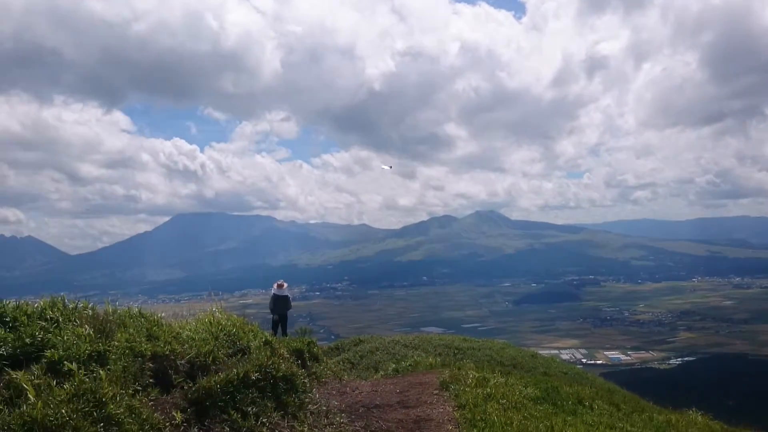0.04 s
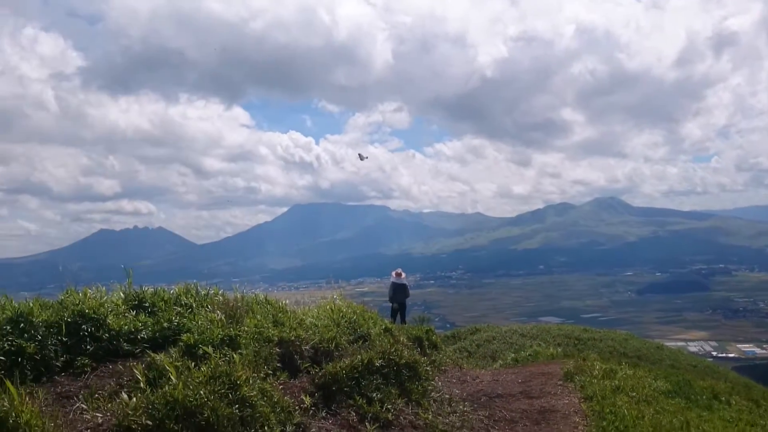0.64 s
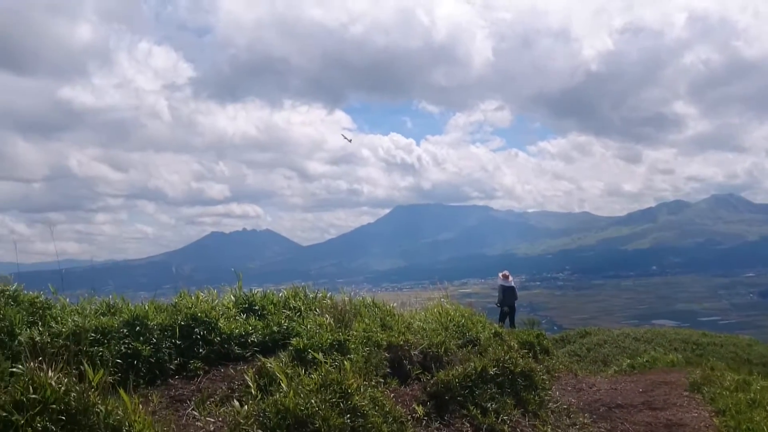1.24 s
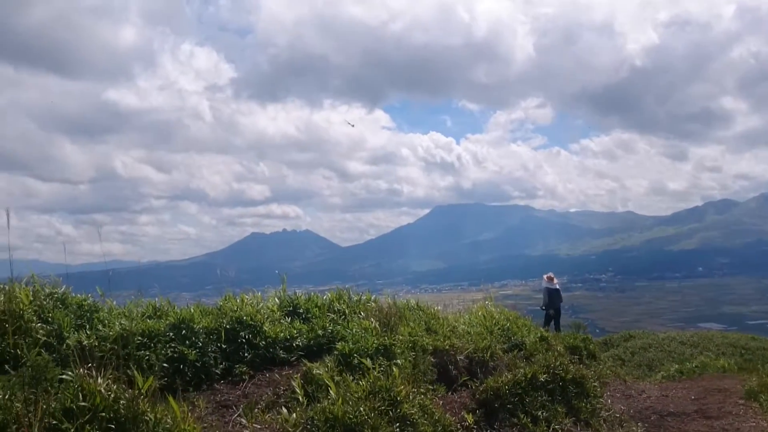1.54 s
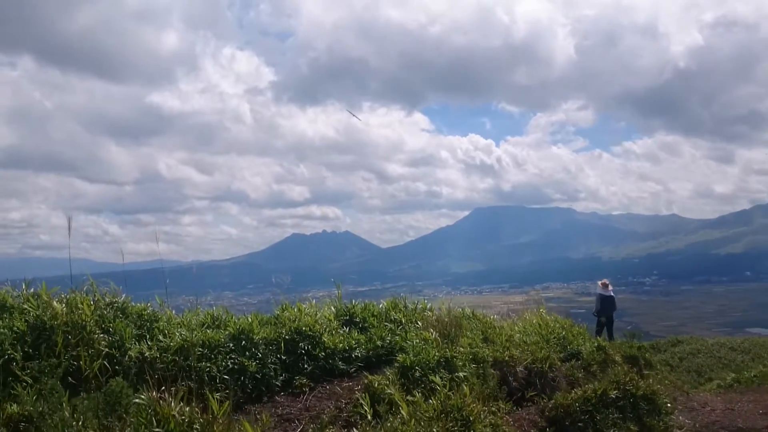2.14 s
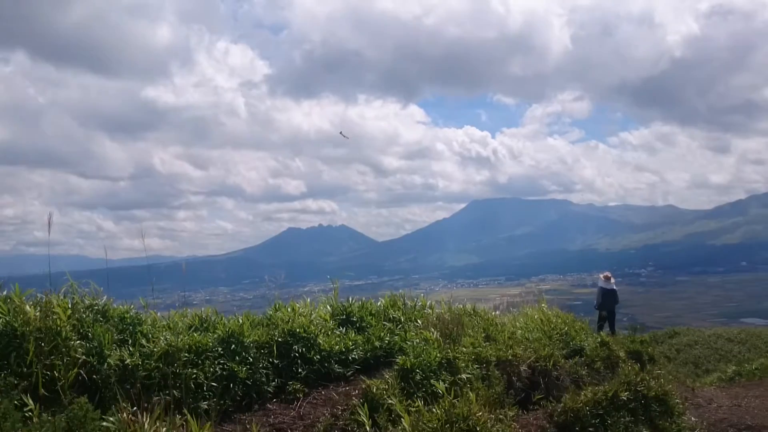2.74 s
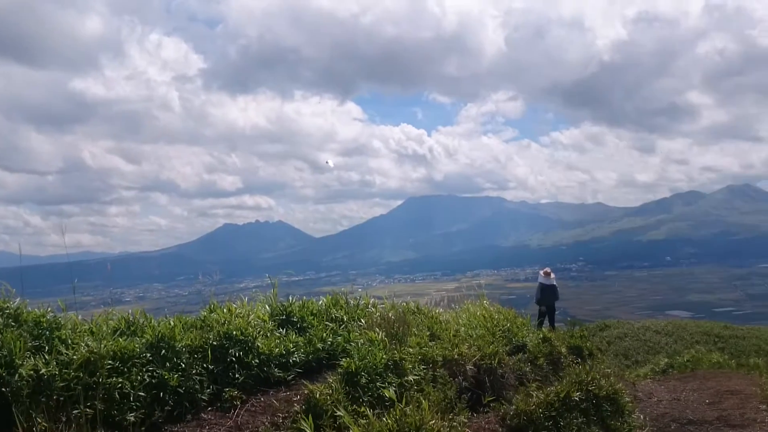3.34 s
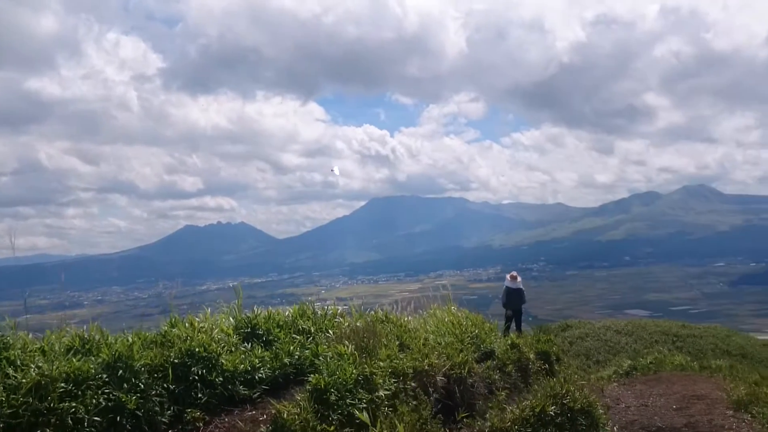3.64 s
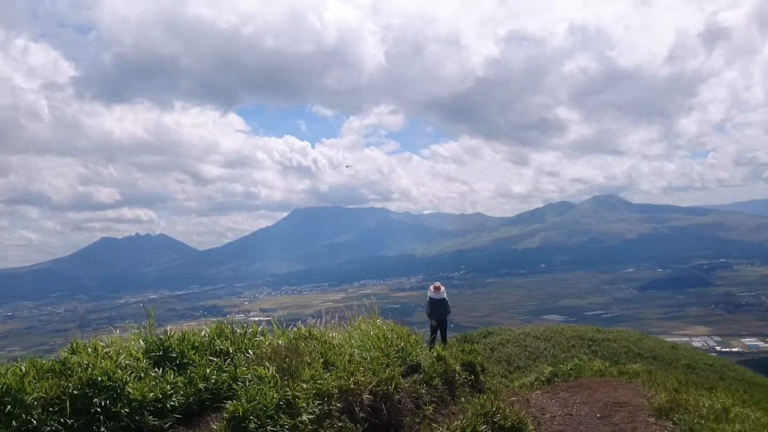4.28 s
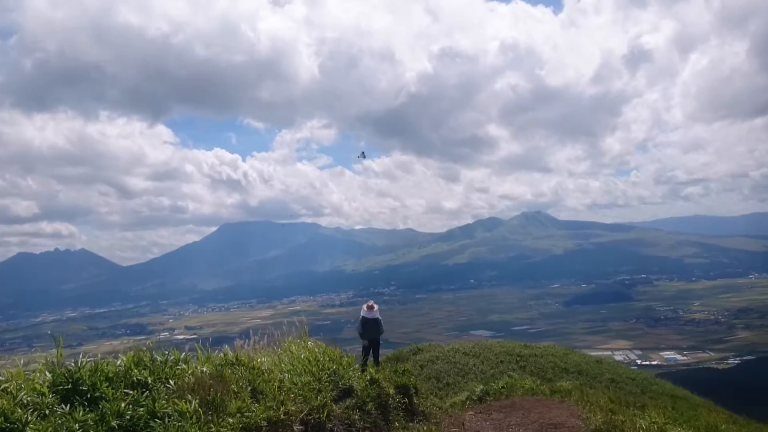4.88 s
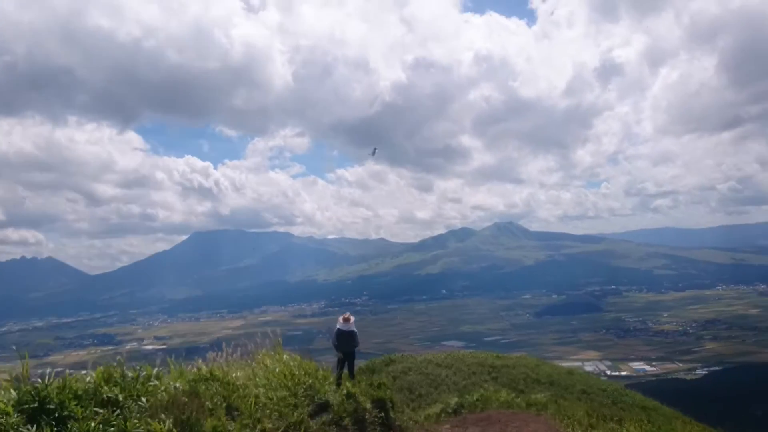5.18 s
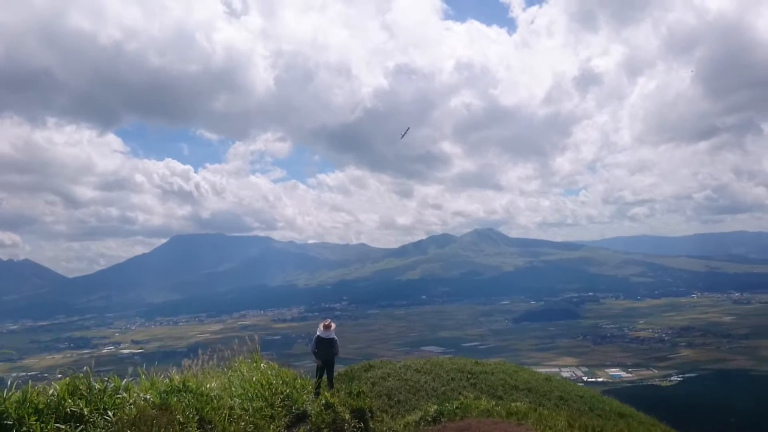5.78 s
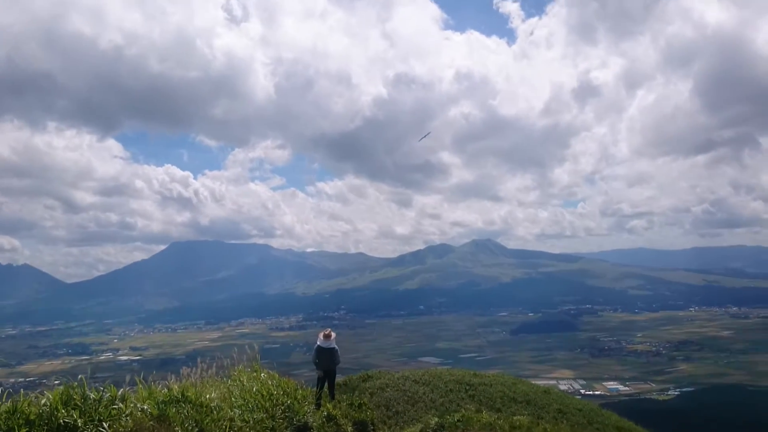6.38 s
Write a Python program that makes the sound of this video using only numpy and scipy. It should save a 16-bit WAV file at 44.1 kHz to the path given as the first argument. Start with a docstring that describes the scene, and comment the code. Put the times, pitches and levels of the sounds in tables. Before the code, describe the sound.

Dry rustles swell close by on a breezy hilltop while insects trill and gusts thump the microphone.

```python
"""A grassy hilltop in light wind, on the two microphone ports of a small hand-held camera.
From the start a cricket trills in the grass to the left and a katydid rasps to the right, over quiet air.
In the first second or so eddies thump the ports. Close by, dry rustles (grass blades or a jacket sleeve)
swell again and again, with a few sharp ticks. Near five seconds both insects sing louder, and after six
the strongest gusts buffet the right port."""
import sys
import numpy as np
from scipy import signal
from scipy.fft import rfft, irfft
from scipy.io import wavfile
from scipy.ndimage import uniform_filter1d

SR = 44100
rng = np.random.default_rng(int(sys.argv[2]) if len(sys.argv) > 2 else 0)


def store_pcm(level_fs):
    """Save levels as 16-bit WAV."""
    pcm = np.round(np.clip(level_fs, -1, 1) * 32767).astype(np.int16)
    wavfile.write(sys.argv[1], SR, np.atleast_2d(pcm).T)


N = 291942
TIME = np.arange(N) / SR
FREQ = np.arange(N // 2 + 1) * SR / N
PORT_LAG_S = 0.000344  # the right port hears this much later


def rustle():
    """Close by, dry surfaces catch and slip; harder rubbing makes the slips denser and brighter."""
    # tone of the rustle at each port: frequency_hz, left_db, right_db
    tone = [(300.0, -32.5, -22.5), (740, -17.5, -12), (1230, -17.5, -6.5), (2020, -19, 2),
            (2940, -17.5, -3.5), (3810, -18.5, 1.5), (4260, -20.9, -3.5), (4990, -20.5, -18),
            (6730, -7.5, -9), (7300, -8, -15), (9330, -9.5, -16.5), (10800, -20, -19.5),
            (11500, -28.5, -14.5), (15200, -31, -15)]
    # how much of it both ports share: frequency_hz, power_share
    likeness = [(300, 0.86), (1000, 0.99), (2300, 0.2), (4000, 0.63), (6800, 0), (10000, 0), (15000, 0.6)]
    # dull scuffs where the rubbing bites: peak_s, level_db, half_length_s
    scuffs = [(.27, -58, 0.028), (1.67, -55, 0.0091), (4.936, -67, 0.02), (5.209, -55, 0.022),
              (5.681, -54.5, 0.043), (6.451, -47, 0.013)]
    rub_db, bright_db = rubbing()
    effort_db = rub_db + 51
    grains = slips(per_s=2400 * undb(0.62 * effort_db), spread_db=2.5, hiss=0.99)
    grains *= undb(0.98 * walk(64))
    heard = ports(grains[0], grains[1:], likeness)
    friction = colour(heard, tone)
    high, top = treble(friction, hz=4680), treble(friction, hz=11100)
    body = (friction - high) / np.std((friction - high).mean(axis=0))
    top_gain = undb(0.084 * effort_db + 1.4)
    sheen = (high + top * (top_gain - 1)) / np.std(high.mean(axis=0))
    swish = body * undb(-2 + 0.82 * walk(25)) + sheen * undb(bright_db + 0.48 * walk(23))
    scuff = unit(band(heard, hz=1200, width_hz=1400))
    bite = sum(undb(db) * swell(s, half_s, 0, half_s) for s, db, half_s in scuffs)
    return swish * undb(rub_db) + scuff * pan(-8) * bite


def rubbing(contact_treble_db=-5):
    """Level and treble of the rubbing in dB: overlapping strokes add in power to the light contact."""
    # light contact that goes on between strokes: time_s, level_db
    contact = [(0, -69.5), (.3, -58.5), (1.15, -62.5), (1.8, -58.5), (4.45, -59), (4.75, -63), (5.45, -67),
               (5.85, -63), (6.25, -69.5), (6.62, -63.5)]
    # rubbing strokes near the microphone: peak_s, level_db, rise_s, hold_s, fade_s, treble_db
    strokes = [(0.31, -53.5, 0.057, 0.27, 0.093, 1), (0.711, -47.5, 0.096, 0.096, 0.078, -0.5),
               (1.027, -57, 0.028, 0.061, 0.018, 0), (1.299, -56, 0.064, 0.087, .1, -2),
               (1.643, -41.5, .12, 0.014, 0.086, -1.5), (1.934, -57, 0.065, 0.16, .06, -4),
               (2.136, -53.5, .05, .05, 0.078, 1), (2.29, -47.5, 0.067, 0.032, .11, 1.5),
               (2.507, -47, 0.16, 0.059, 0.031, -0.5), (2.76, -53.5, 0.037, 0.047, 0.061, -3),
               (2.893, -52, .03, 0.15, 0.024, -3), (3.258, -43.5, 0.12, 0.049, 0.084, -1),
               (3.465, -59, 0.16, 0.067, 0.19, 0), (3.702, -53.5, 0.028, 0.07, 0.031, -3.5),
               (3.977, -50, 0.17, .18, 0.075, 0.5), (4.264, -55.5, 0.042, 0.025, 0.012, 1.5),
               (4.523, -55, .02, 0.11, 0.046, -6.5), (4.921, -42.5, 0.072, 0.019, .03, -2.5),
               (4.986, -53.5, 0.032, 0.078, .15, -2.5), (5.32, -59, 0.048, 0.036, 0.027, -5),
               (5.535, -60, 0.052, 0.074, .05, 3), (5.663, -50, 0.049, 0.017, 0.027, -1),
               (6.071, -56.5, 0.16, 0.023, 0.03, -6), (6.487, -58, 0.04, 0.017, 0.019, -6),
               (6.604, -60, 0.019, .02, .04, -13)]
    power = undb(curves(contact)[0]) ** 2
    weighted_treble = power * contact_treble_db
    for s, db, rise_s, hold_s, fade_s, treble_db in strokes:
        stroke_power = (undb(db) * swell(s, rise_s, hold_s, fade_s)) ** 2
        power += stroke_power
        weighted_treble += stroke_power * treble_db
    return 10 * np.log10(power), weighted_treble / power


def slips(per_s, spread_db, hiss):
    """Three streams of tiny slips, most weak and a few strong, over the hiss of countless smaller ones."""
    hit = rng.random((3, N)) < per_s / SR
    size = undb(spread_db * np.minimum(rng.exponential(size=(3, N)), 5))
    crackle = unit(hit * size * rng.choice([-1, 1], (3, N)))
    return unit(crackle + hiss * rng.standard_normal((3, N)))


def ticks(decay_s=0.0025, gain_db=1.5):
    """A stiff bit snaps free: a crack that dies within milliseconds and reaches the right port later."""
    # single cracks: start_s, relative_level_db, relative_treble_db
    cracks = [(1.0097, -39.5, -4), (1.4235, -45, -4), (1.915, -49, -6), (1.934, -40, -23),
              (2.1044, -43, -29), (2.305, -35, -7), (2.4698, -32.5, -14), (2.5794, -40, -5),
              (2.6408, -38, -9), (3.105, -38.5, -13), (3.8647, -39, -6), (4.5234, -44.5, -14),
              (4.81, -37.5, -13), (5.0392, -37, -22), (5.1014, -44, -2), (5.4541, -50, -15),
              (5.523, -43.5, -9), (6.095, -37, -17), (6.447, -40.5, -13)]
    # tone of a crack's treble: frequency_hz, gain_db
    snap_tone = [(3000, -30), (5200, -18), (6600, -4), (8500, -3), (10500, -7), (15000, -6)]
    knocks, snaps = np.zeros((2, N))
    age = np.arange(SR // 50) / SR
    knock_filter = signal.butter(3, [1200, 3900], "band", fs=SR, output="sos")
    for s, db, bright_db in cracks:
        crack = rng.standard_normal(len(age)) * np.exp(-age / decay_s)
        knock = signal.sosfilt(knock_filter, crack)
        at = slice(int(s * SR), int(s * SR) + len(age))
        knocks[at] += undb(db) * knock / np.abs(knock).max()
        snaps[at] += undb(db + bright_db) * crack / np.abs(crack).max()
    snaps = undb(13) * colour(snaps, snap_tone)
    left, right = undb(gain_db) * (pan(-23) * knocks + pan(2) * snaps)
    return np.array([left, np.roll(right, int(PORT_LAG_S * SR))])


def buffeting():
    """Turbulence presses on each port separately; the strongest eddies are single push-pull thumps."""
    # tone of wind on the microphone: frequency_hz, gain_db
    tone = [(15, -54), (30, -38), (52, 6), (72, 7.5), (110, -1), (170, -13.5), (250, -30), (400, -38),
            (900, -77)]
    # single eddies that hit a port: peak_s, level_db, left_minus_right_db, half_length_s
    eddies = [(0.631, -45, -17, 0.0012), (0.845, -34.5, -30, 0.0032), (0.882, -38.5, 20, 0.0011),
              (1.07, -43, 6, 0.0018), (6.175, -24.5, -23, 0.0019), (6.21, -27.5, -26, 0.0015)]
    rumble = unit(colour(rng.standard_normal((2, N)), tone))
    # the gust sets the strength, so the rumble's own swings are partly evened out
    rumble = unit(rumble / uniform_filter1d(rumble ** 2, SR // 20) ** 0.5)
    wind = rumble * flow()
    for s, db, side_db, half_s in eddies:
        offset = (TIME - s) / half_s
        wind += undb(db) * pan(side_db) * (1 - offset ** 2) * np.exp(-offset ** 2 / 2)
    return wind


def flow(breeze_db=-71, breeze_side_db=-3.5):
    """Strength of the wind at each port: gusts, each favouring one side, over a light breeze."""
    # gusts on the microphone: peak_s, level_db, rise_s, hold_s, fade_s, left_minus_right_db
    gusts = [(0.05, -57.5, 0.047, 0.017, 0.082, -11), (.42, -59, 0.044, 0.13, .03, -21),
             (0.616, -44, 0.013, 0.019, 0.026, -27), (.715, -45.5, .02, .02, 0.025, -21),
             (0.805, -42.5, 0.023, 0.026, 0.025, -23), (0.878, -39.5, .015, 0.013, 0.02, 15),
             (0.943, -50, .03, 0.17, 0.039, -16), (1.067, -40, 0.012, 0.017, 0.022, 4),
             (1.196, -55.5, 0.067, 0.22, .13, 6), (2.43, -61, 0.053, 0.1, 0.042, 9),
             (2.795, -67.5, 0.043, 0.19, 0.066, 6), (3.39, -67, .03, 0.17, .04, 5),
             (4.44, -67, 0.051, .17, .04, -23), (4.797, -59, .02, 0.0089, 0.017, -34),
             (4.937, -58, 0.022, 0.022, .03, -20), (5.518, -46, 0.053, 0.081, .04, -29),
             (5.674, -46.5, .03, 0.2, 0.033, -7), (6.047, -36, 0.063, 0.045, 0.033, -22),
             (6.17, -31, 0.032, 0.041, 0.024, -19), (6.262, -34.5, 0.029, 0.15, .025, -18),
             (6.438, -28, 0.024, .04, 0.046, -21), (6.62, -40, 0.044, 0.022, 0.035, -4)]
    power = (undb(breeze_db) * pan(breeze_side_db)) ** 2
    for s, db, rise_s, hold_s, fade_s, side_db in gusts:
        power = power + (undb(db) * pan(side_db) * swell(s, rise_s, hold_s, fade_s)) ** 2
    return np.sqrt(power)


def katydid(strokes_per_s=55, chirp_s=0.09):
    """In the grass to the right: evenly spaced chirps of rasping wing strokes, each louder than the last."""
    # bouts of chirping: start_s, end_s, chirp_period_s, relative_level_db
    bouts = [(0.038, .92, .187, -60.5), (1.045, 1.37, .185, -59), (1.774, 3.04, .187, -64),
             (3.556, 4.5, .194, -63.5), (4.534, 6.62, .194, -58)]
    # tone of the wings' rasp: frequency_hz, gain_db
    tone = [(9000, -41), (10900, -26), (11700, -1), (12400, -2), (13000, -3), (14000, -16), (16000, -33)]
    strokes = np.zeros(N)
    for start, end, period_s, db in bouts:
        age = (TIME - start) % period_s
        singing = (TIME >= start) & (TIME < end) & (age < chirp_s)
        crescendo = 0.5 + age / chirp_s
        strokes += undb(db) * singing * crescendo * np.sin(np.pi * age * strokes_per_s) ** 2
    rasp = unit(colour(rng.standard_normal((2, N)), tone))
    song = scatter(rasp * strokes, echo=0.7, decay_s=0.012)
    return song * pan(-16) * undb(-3 + 0.8 * walk(20))


def cricket(roughness=0.5):
    """To the left: each wing stroke starts as a high note, then fades and falls as the scraper slows."""
    # course of the trill: time_s, strokes_per_s, level_db, pitch_hz
    trill = [(0, 34.7, -71, 8800), (1.2, 35.8, -67, 8820), (3, 35.5, -68, 8850), (4.4, 35.5, -68, 8900),
             (4.7, 35.5, -64, 8900), (5.2, 35.5, -61.5, 8900), (5.8, 35.4, -63.5, 8820),
             (6.62, 35.1, -62.5, 8780)]
    strokes_per_s, db, hz = curves(trill)
    stroke_phase = np.cumsum(strokes_per_s * (1 + 0.01 * walk(13.6))) / SR % 1
    follow_through = 0.45 * undb(0.5 * (db + 63))  # harder singing draws the stroke out
    push = np.exp(-((stroke_phase - 0.3) / 0.14) ** 2)
    push += follow_through * np.exp(-((stroke_phase - 0.56) / 0.16) ** 2)
    pitch_hz = hz - 2400 * np.maximum(stroke_phase - 0.37, 0) + 95 * walk(300)
    note = push * np.sin(2 * np.pi * np.cumsum(pitch_hz) / SR) * (1 + roughness * walk(380))
    song = scatter(note, echo=0.6, decay_s=0.014)
    return unit(song) * undb(db) * pan(12)


def scatter(call, echo, decay_s):
    """Stems and ground add a short diffuse tail to an insect's call, different at each port."""
    age = np.arange(SR // 12) / SR
    tail = rng.standard_normal((2, len(age))) * np.exp(-age / decay_s)
    tail = echo * tail / np.sqrt(np.sum(tail ** 2, axis=1, keepdims=True))
    return call + signal.fftconvolve(np.atleast_2d(call), tail, axes=1)[:, :N]


def air(level_db=-61):
    """Wind over the far slopes: a soft, nearly steady hiss."""
    # tone of the distant wind: frequency_hz, left_db, right_db
    tone = [(30, -22, -22), (80, -1, -1), (160, -7, -7), (280, -6, -4), (500, -6, -4), (900, -8, -8),
            (1500, -12, -10), (2200, -14, -11), (3600, -19, -16), (5000, -22, -20), (6800, -16, -19),
            (10300, -27, -27), (14500, -23, -22)]
    # how much of it both ports share: frequency_hz, power_share
    likeness = [(100, 0.93), (400, 0.56), (1000, 0.06), (3000, 0), (8000, 0)]
    noise = rng.standard_normal((3, N))
    bed = unit(colour(ports(noise[0], noise[1:], likeness), tone))
    return bed * undb(level_db + 0.088 * walk(14))


def ports(common, own, likeness, bass_turn_rad=2.73):
    """A wide stereo pair: the right port hears shared sound later, its lows nearly in opposite phase."""
    share = np.clip(spectra(likeness)[0], 0, 1)
    turn = np.maximum(bass_turn_rad, 2 * np.pi * FREQ * PORT_LAG_S)
    shared = rfft(common) * np.array([np.ones(len(FREQ)), np.exp(-1j * turn)])
    return irfft(np.sqrt(share) * shared + np.sqrt(1 - share) * rfft(own), N)


def pan(left_minus_right_db):
    """Left and right gains of mean power 1."""
    gains = undb(np.array([[left_minus_right_db], [-left_minus_right_db]]) / 2)
    return gains / np.sqrt(np.mean(gains ** 2, axis=0))


def swell(peak_s, rise_s, hold_s, fade_s, roundness=1.32):
    """An envelope that swells to 1 at peak_s, holds and fades."""
    away = np.maximum(peak_s - TIME, 0) / rise_s + np.maximum(TIME - peak_s - hold_s, 0) / fade_s
    return np.exp(-np.minimum(away, 8) ** roundness)


def walk(rate_hz):
    """A smooth random drift of rms 1, with little motion faster than rate_hz."""
    return unit(irfft(rfft(rng.standard_normal(N)) * np.exp(-(FREQ / rate_hz) ** 2), N))


def undb(db):
    """Decibels to gain."""
    return 10 ** (np.asarray(db) / 20)


def unit(x):
    """Scale to rms 1."""
    return x / np.sqrt(np.mean(x ** 2))


def curves(table):
    """The columns of a time table at every sample."""
    s, *columns = np.transpose(table)
    return [np.interp(TIME, s, column) for column in columns]


def spectra(table):
    """The columns of a frequency table at every bin."""
    hz, *columns = np.transpose(table)
    return np.array([np.interp(np.log(FREQ + 1), np.log(hz), column) for column in columns])


def colour(x, tone):
    """Filter by a table of frequency_hz and one or two columns of gain_db."""
    return irfft(rfft(x) * undb(spectra(tone)), N)


def band(x, hz, width_hz):
    """One smooth band with steep skirts."""
    return irfft(rfft(x) / (1 + (2 * (FREQ - hz) / width_hz) ** 4), N)


def treble(x, hz):
    """The part of a sound above hz."""
    return irfft(rfft(x) * (1 - 1 / (1 + (FREQ / hz) ** 6)), N)


def scene():
    """All that reaches the two ports on the hilltop."""
    return rustle() + ticks() + buffeting() + air() + cricket() + katydid()


def record(dry):
    """The camera cuts the top steeply."""
    top_hz = 15850
    return signal.sosfilt(signal.ellip(10, 0.1, 80, top_hz, fs=SR, output="sos"), dry)


dry = scene()
out = record(dry)
store_pcm(out)
```